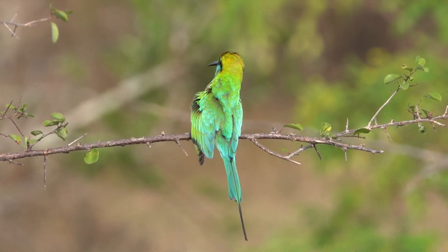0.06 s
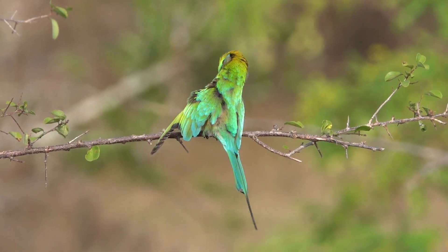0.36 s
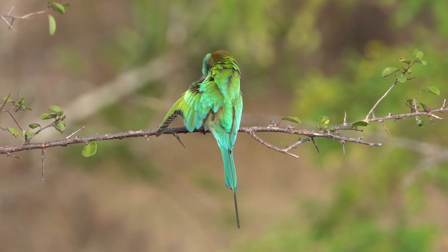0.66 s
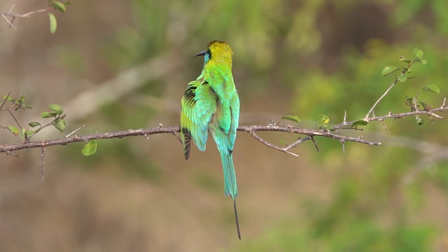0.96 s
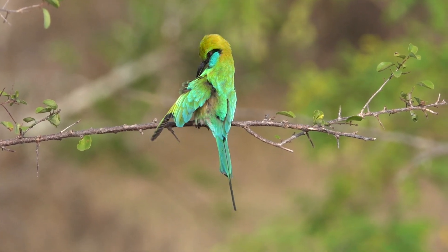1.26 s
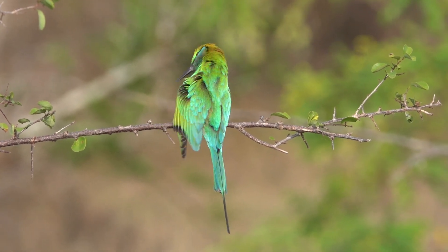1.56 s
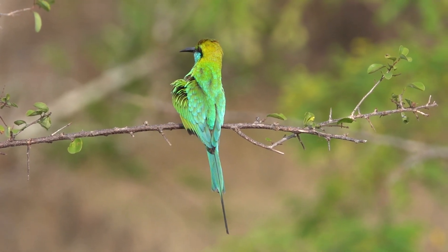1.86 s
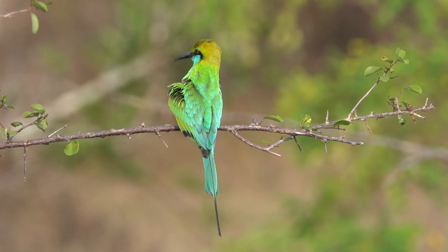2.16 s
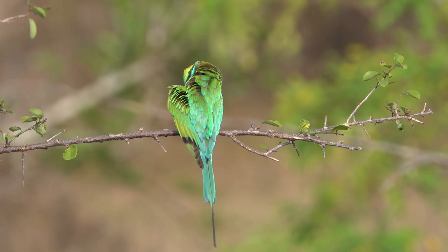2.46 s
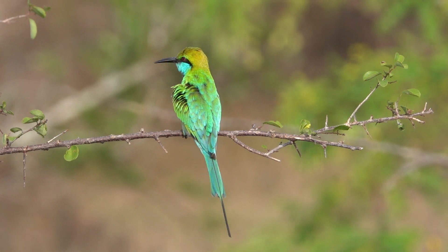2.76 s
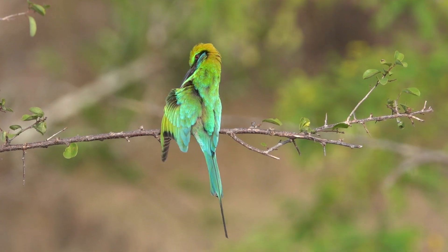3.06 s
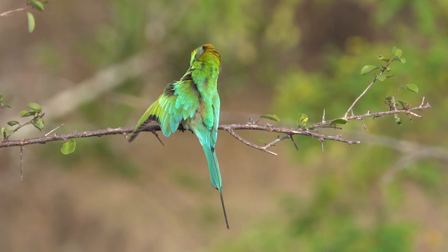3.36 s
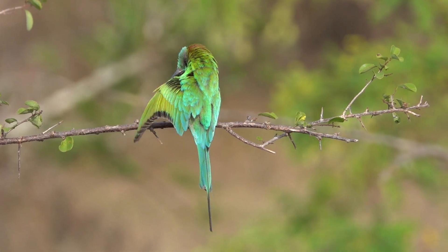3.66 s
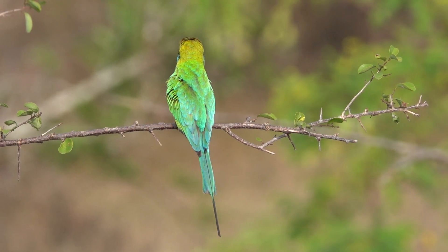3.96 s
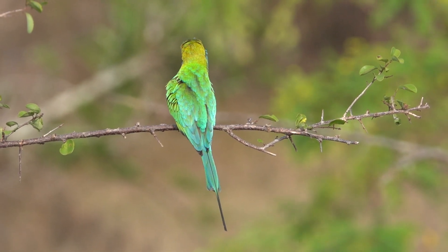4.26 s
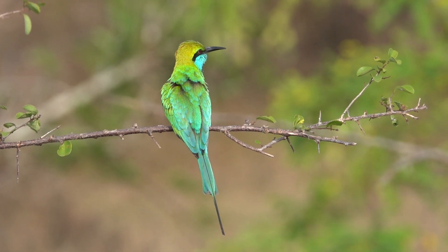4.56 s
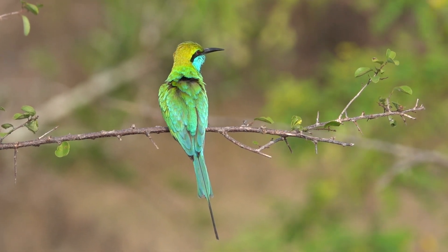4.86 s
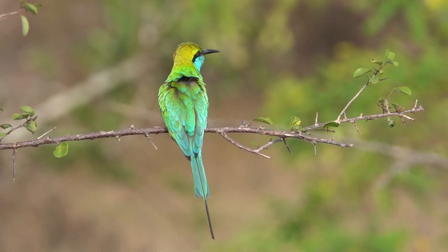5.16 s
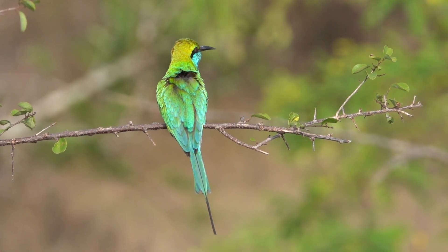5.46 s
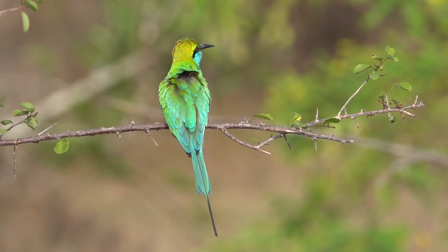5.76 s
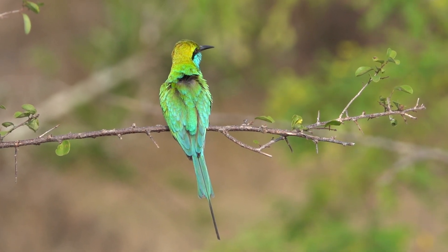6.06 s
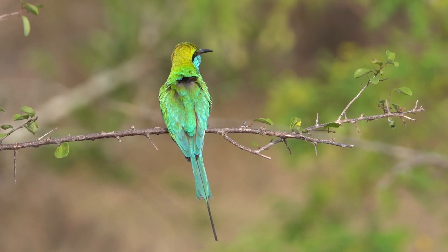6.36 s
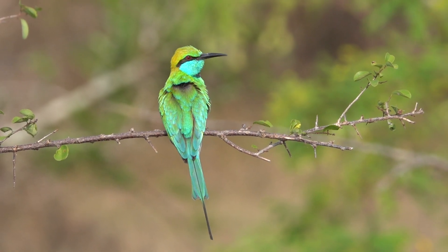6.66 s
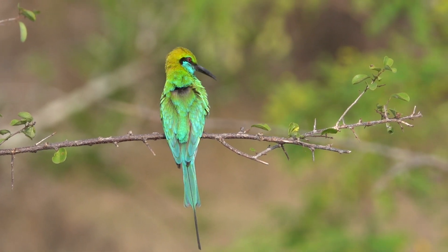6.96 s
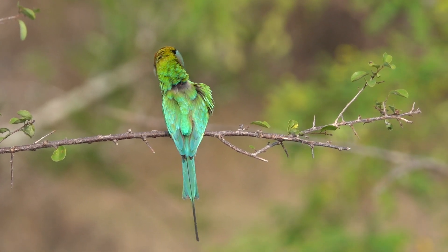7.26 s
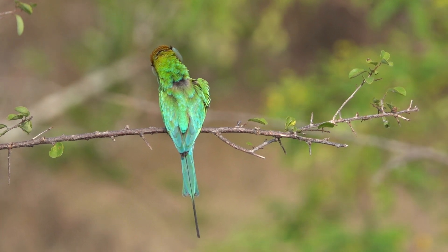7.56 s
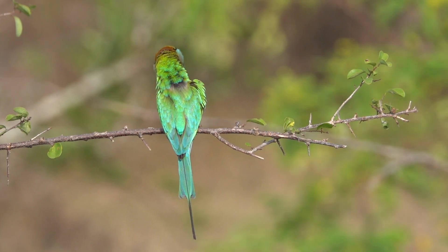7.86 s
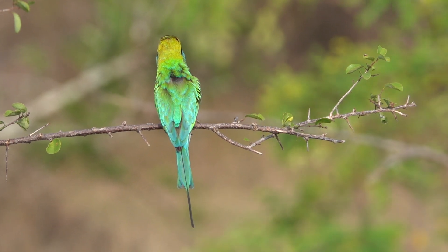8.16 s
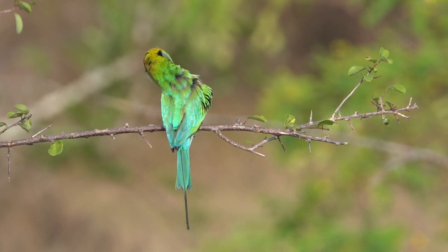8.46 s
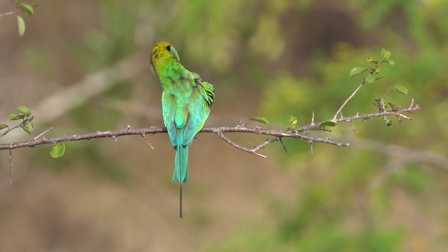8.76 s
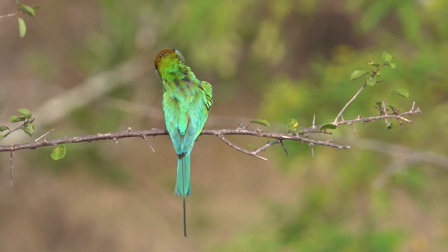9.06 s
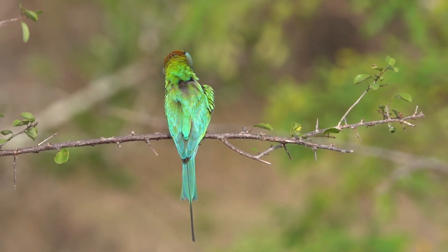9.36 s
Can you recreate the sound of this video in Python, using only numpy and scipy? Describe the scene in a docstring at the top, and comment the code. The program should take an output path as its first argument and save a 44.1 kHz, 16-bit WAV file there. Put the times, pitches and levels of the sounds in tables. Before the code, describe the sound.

Gusty wind rumbles and thumps on the microphone, then eases, while faint birds whistle and chirp in open scrubland.

```python
"""Wind and birds in dry scrubland

Gusts buffet the microphone: their eddies press on its two ports as rumble, flutter and thumps. One faint bird
gives thin, high, falling notes; others whistle and chatter lower down, and the bushes scatter their calls.
Something snaps once on the camera, a few tiny ticks sound close by, some gusts crackle sharply, and the open
country murmurs underneath."""
import sys
import numpy as np
from scipy import signal
from scipy.fft import rfft, irfft
from scipy.io import wavfile
from scipy.ndimage import uniform_filter1d

SR = 44100
rng = np.random.default_rng(int(sys.argv[2]) if len(sys.argv) > 2 else 0)


def store_wav(level_fs):
    """Save 16-bit WAV to argv[1]."""
    pcm = np.round(np.clip(np.atleast_2d(level_fs), -1, 1) * 32767)
    wavfile.write(sys.argv[1], SR, pcm.T.astype(np.int16))


N = 423801
TIME = np.arange(N) / SR
HZ = np.fft.rfftfreq(N, 1 / SR)
STRONG_GUST_DB, STRONG_BUFFET_DB = -24.5, -27.5  # a strong gust and the small eddies it sheds


def wind():
    """Turbulent pressure: large eddies press on both ports alike, small ones hit each port apart."""
    # eddy spectra, from the largest eddies to the smallest: frequency_hz, relative_db
    lull_spectrum = [(8, -13), (22, -5), (45, -1.5), (72, 2), (105, -5), (150, -10.5), (220, -26.5),
                     (400, -64.5), (1500, -120)]
    rumble_spectrum = [(8, -23.5), (22, -15), (45, -6), (70, -2), (105, 0.5), (150, -4), (220, -21),
                       (400, -77.5), (1500, -120)]
    buffet_spectrum = [(50, -23.5), (110, -7), (165, 1.5), (230, -3.5), (320, -13.5), (450, -31.5),
                       (700, -58), (3000, -125)]
    flutter_spectrum = [(130, -10.5), (220, 5.5), (310, 9), (430, 0.5), (580, -10.5), (780, -24.5),
                        (1100, -41), (2000, -57.5), (5000, -71.5), (12000, -105)]
    rumble_db, buffet_db = gust_levels()
    shoves = drift(13)  # a gust arrives unevenly, in eddies of every size
    speed = np.clip((rumble_db + 42) / 18, 0, 1)
    fast = np.sqrt(speed) * eddies(rumble_spectrum, correlation=0.87)
    slow = np.sqrt(1 - speed) * eddies(lull_spectrum, correlation=0.94)  # slow air sounds lower
    rumble = (fast + slow) * amp(rumble_db - 1.22 + 2.28 * shoves + 2.0 * drift(26))
    buffet = eddies(buffet_spectrum, correlation=0.48)
    buffet *= amp(buffet_db - 1.0 + 2.0 * shoves + 2.6 * drift(32))
    # the smallest eddies grow faster than the gust itself, and come in bursts
    growth_db = 0.67 * np.minimum(buffet_db + 21, 3)
    flutter_db = buffet_db - 7.5 + growth_db + 1.4 * shoves + 4.06 * drift(50)
    flutter = eddies(flutter_spectrum, correlation=-0.22) * amp(flutter_db)
    return rumble + buffet + flutter + crackle(buffet_db)


def gust_levels(rise_db_per_s=211, fall_db_per_s=258.5, buffet_growth=1.706):
    """Incoherent addition: gusts and breeze sum in power. Returns large- and small-eddy levels in dB."""
    # gusts: full_strength_at_s, hold_s, level_db, extra_turbulence_db
    gusts = [(0.075, 0.18, -32.0, 3), (0.464, 0.25, -24.5, 2.5), (0.598, 0.027, -22.5, 0.5),
             (0.781, 0.011, -25.5, 4.5), (0.846, 0.14, -28, -1.5), (1.046, 0.13, -23.5, -3.5),
             (1.239, 0.19, -23.5, 0), (1.456, 0.14, -27.5, -4), (1.816, 0.015, -30, 1),
             (1.909, 0.12, -22.0, -1.5), (2.043, 0.23, -29.5, 0.0), (2.296, 0.039, -25.0, 1),
             (2.39, 0.21, -28, -2.5), (2.78, 0.62, -23, 4), (3.015, 0.25, -24, 3.5),
             (3.608, 0.085, -31, -3.5), (3.824, 0.01, -38, 7), (3.917, 0.011, -29.5, -3.5),
             (4.025, 0.013, -41.5, -4), (4.439, 0.011, -23, 5), (4.484, 0.27, -32.0, -0.5),
             (4.697, 0.017, -30, -2), (4.883, 0.099, -39.5, 5.5), (5.059, 0.067, -31.5, 4.5),
             (5.259, 0.076, -35.5, 0.5), (5.426, 0.091, -39, -2), (5.801, 0.22, -33.0, -1),
             (6.144, 0.015, -24, 1.0), (6.249, 0.067, -19, -7.5), (6.299, 0.14, -22, -3.5),
             (6.524, 0.054, -22, -4.5), (6.622, 0.057, -31, -9.5), (6.903, 0.011, -31.5, -8),
             (7.105, 0.086, -39.5, -2), (7.434, 0.15, -37.5, -10.5), (8.092, 0.15, -40.5, -11),
             (8.348, 0.072, -37.5, -13), (8.663, 0.2, -42.5, -8), (9.133, 0.015, -43, -3),
             (9.428, 0.051, -53, 0.0)]
    # light air between gusts: time_s, level_db
    breeze = [(0, -48), (2.7, -49), (5.7, -42), (7.3, -51), (9.6, -55.5)]
    t = np.linspace(0, TIME[-1], N // 64)
    start, hold, db, turbulence_db = np.transpose(gusts)[:, :, None]
    rising_db = rise_db_per_s * np.maximum(start - t, 0)
    falling_db = fall_db_per_s * np.maximum(t - start - hold, 0)
    large_db = np.vstack([db - rising_db - falling_db, np.interp(t, *np.transpose(breeze))])
    small_db = STRONG_BUFFET_DB + buffet_growth * (large_db - STRONG_GUST_DB)
    small_db[:-1] += turbulence_db  # the last row is the breeze
    powers = [(amp(levels) ** 2).sum(0) for levels in (large_db, small_db)]
    return [np.interp(TIME, t, 10 * np.log10(power)) for power in powers]


def eddies(spectrum, correlation):
    """Stationary turbulence: steady in power, lumpy only from one eddy to the next."""
    pressure = noise(spectrum, correlation)
    local_power = uniform_filter1d((pressure ** 2).mean(0), size=2600)
    return pressure / np.sqrt(local_power + 1e-12)


def crackle(buffet_db, max_per_s=41, rise_s=0.00041, fall_s=0.0013):
    """Shot noise: the sharpest eddies flick one port or the other, more often as the gust grows."""
    t = TIME[:SR // 100]
    flick = np.gradient((1 - np.exp(-t / rise_s)) ** 3 * np.exp(-t / fall_s))
    activity = np.minimum(amp(buffet_db - STRONG_BUFFET_DB), 1)
    hits = rng.random((2, N)) < max_per_s / 2 / SR * activity
    peak_db = buffet_db - 21 + 2.5 * np.minimum(rng.exponential(1, (2, N)), 3)
    return signal.oaconvolve(hits * amp(peak_db), flick[None] / flick.max(), axes=1)[:, :N]


def thumps(rise_s=0.00047, other_port_db=-8):
    """Bipolar pressure pulse: a passing eddy gives one push and pull, mostly on one port."""
    # single eddies: start_s, peak_db
    passes = [(0.476, -11.5), (0.505, -18), (0.633, -13), (0.686, -10.5), (1.233, -8), (1.29, -12.5),
              (1.384, -10), (2.305, -21), (2.783, -6.5), (2.84, -11.5), (2.977, -7), (3.209, -12),
              (3.377, -17.5), (4.421, -9), (6.235, -11.5)]
    out, u = np.zeros((2, N)), TIME[:SR // 50] / rise_s
    pulse = np.gradient(u ** 6 * np.exp(-u))
    for (s, db), port in zip(passes, rng.integers(0, 2, len(passes))):
        sides = np.roll([1, amp(other_port_db)], port)[:, None]
        add(out, s, amp(db) * sides * pulse / pulse.max())
    return out


def syrinx(hz, level_db, rasp, buzz_hz=85, buzz_depth=.07, jitter=0.12, waver_db=3.0):
    """Modulation: a near-pure whistle turns raspy as buzz and jitter shake its pitch and level."""
    t = np.arange(len(hz)) / SR
    shake = unit_rms(uniform_filter1d(rng.standard_normal(SR), size=45))[:len(t)]
    waver = unit_rms(uniform_filter1d(rng.standard_normal(SR), size=500))[:len(t)]
    buzz = np.sin(2 * np.pi * (buzz_hz * t + rng.random()))
    pitch_hz = hz * (1 + rasp * (buzz_depth * buzz + jitter * shake))
    phase = 2 * np.pi * np.cumsum(pitch_hz) / SR
    overtone = amp(-27) * np.sin(2 * phase) * (hz < 4500)
    low_voice = rasp * amp(-6.5) * np.sin(0.9 * phase) * (1 + buzz)  # the other side of the syrinx
    envelope = amp(level_db + waver_db * waver) * (1 + 0.12 * rasp * buzz)
    return np.sqrt(2) * (np.sin(phase) + overtone + low_voice) * envelope


def high_bird(rasp=.07):
    """Frequency glides: thin notes flick up and slide steeply down."""
    # contours of the short and the long note: time_s, pitch_hz, relative_db
    seet_shape = [(0, 6300, -5), (.014, 8020, -3.5), (.028, 7300, 0), (.046, 6850, -2), (.066, 5900, -7.5),
                  (.08, 5520, -6.5), (.105, 5400, -20.5)]
    slur_shape = [(0, 6600, -17), (.015, 7100, -14), (.048, 7100, -5.5), (.07, 6070, -8.5),
                  (.095, 5350, -19.5), (.125, 5070, -18), (.16, 4440, -21)]
    # notes of each shape: start_s, level_db, pitch_factor, length_factor
    seets = [(.18, -63.5, 1.02, 0.85), (1.372, -66.5, 0.98, 1.3), (1.564, -63, 0.98, 0.79),
             (3.808, -74, 1, 1.1), (3.997, -69, 0.97, 1.02), (9.394, -75.5, 0.97, 1.7)]
    slurs = [(1.778, -60.5, 1, 1), (2.119, -64, 0.96, .93), (4.228, -64.5, 1, 0.94)]
    out = np.zeros(N)
    for shape, notes in ((seet_shape, seets), (slur_shape, slurs)):
        times, hz, db = np.transpose(shape)
        for s, level_db, pitch_factor, stretch in notes:
            t = np.arange(0, times[-1], 1 / SR / stretch)
            glide = uniform_filter1d(np.interp(t, times, hz), size=200)
            note = syrinx(pitch_factor * glide, level_db + np.interp(t, times, db), rasp)
            add(out, s, note * signal.windows.tukey(len(t), .1))
    return out


def whistles(notes):
    """Continuous tuning: the syrinx glides smoothly through each note's evenly spaced pitches."""
    out = np.zeros(N)
    for s, length, db, *pitches, rasp in notes:
        curve = np.polyfit(np.linspace(0, 1, len(pitches)), pitches, len(pitches) - 1)
        hz = np.polyval(curve, np.linspace(0, 1, round(length * SR)))
        add(out, s, syrinx(hz, db, rasp) * signal.windows.tukey(len(hz), .25))
    return out


def falling(hz, octaves):
    """Decelerating glide: four pitches that drop quickly and then level off."""
    # at four even steps: share_of_fall
    slide_shape = [0, .53, .81, 1]
    return hz / 2 ** (octaves * np.array(slide_shape))


def songster():
    """Frequency-modulated song: one bird gives its phrase twice, the second time more softly."""
    # arch, buzz, low note, rise, buzz, dip: offset_s, length_s, level_db, four of pitch_hz, rasp
    phrase = [ (0, .135, -63.5, 1908, 2590, 2550, 2200, 0.095),
              (.233, .075, -63.5, 2620, 2480, 2380, 2150, .58),
              (.41, 0.078, -76.5, 1615, 1700, 1820, 1800, 0.083),
              (.55, .072, -67, 2330, 2680, 2940, 3220, 0.2),
              (0.626, 0.16, -68, 3180, 2900, 2640, 2510, .62),
              (.872, 0.18, -65.5, 2740, 2115, 2357, 2950, 0.11)]
    # repeats of the phrase: start_s, gain_db
    repeats = [(.065, 0), (7.365, -4)]
    return whistles([(start + s, length, gain_db + db, *voice)
                     for start, gain_db in repeats for s, length, db, *voice in phrase])


def chirps(hoarse_ratio=.63, hoarse_db=-12.5, hoarse_rasp=1):
    """Biphonation: buzzy falling notes, each with a hoarse second voice below it."""
    # chirps: start_s, length_s, level_db, first_pitch_hz, fall_octaves, rasp
    calls = [(0.646, 0.017, -66.5, 4080, .17, .3), (2.672, 0.02, -71.5, 3480, 0.084, .2),
             (2.759, 0.029, -67.5, 2450, 0.21, 0.26), (2.972, 0.026, -65, 2550, .19, 0.2),
             (3.031, 0.035, -72, 2570, .22, 0.8), (3.096, .012, -72, 3900, .1, 0),
             (3.483, 0.033, -66.5, 3580, .18, 0.44), (4.707, .052, -62, 3540, .32, 0.5),
             (5.098, 0.074, -59, 3490, 0.36, 0.37), (6.455, .05, -64, 3620, 0.16, .24),
             (6.853, .055, -64.5, 3550, .13, 0.2), (8.527, 0.078, -70.5, 3580, 0.071, 0.43),
             (9.538, 0.056, -66, 3470, 0.093, .2)]
    upper = [(s, length, db, *falling(hz, fall), rasp) for s, length, db, hz, fall, rasp in calls]
    lower = [(s, length, db + hoarse_db, *falling(hz * hoarse_ratio, fall), hoarse_rasp)
             for s, length, db, hz, fall, _ in calls]
    return whistles(upper + lower)


def far_whistlers(slide_rasp=.1, swoop_rasp=.3, arch_rasp=.22):
    """Frequency sweeps: scattered birds slide down, swoop up or arch over."""
    # falling notes: start_s, length_s, level_db, first_pitch_hz, fall_octaves
    slides = [(0.638, .045, -77, 5000, .36), (0.86, 0.064, -74, 6200, 0.84),
              (0.99, 0.044, -76.5, 5500, 0.75), (1.555, 0.069, -82, 3780, .08),
              (2.42, 0.12, -77, 2380, .38), (5.348, 0.095, -70.5, 2170, 0.13),
              (5.532, 0.079, -81, 7650, 0.047), (6.7, 0.11, -74.5, 2950, 0.086),
              (6.87, 0.14, -75, 2820, 0.023), (7.79, .085, -81, 5100, .4)]
    # rising notes: start_s, length_s, level_db, base_pitch_hz
    swoops = [(2.823, 0.068, -68, 2196), (8.302, .095, -64, 2370)]
    # arched notes: start_s, length_s, level_db, top_pitch_hz, depth_octaves
    arches = [(5.604, .045, -66.5, 2810, 0.057), (6.636, 0.036, -72, 3330, 0.24),
              (7.068, .062, -68.5, 3560, 0.096), (8.969, 0.054, -65, 3150, 0.34)]
    swoop_ratios, arch_shares = np.array([0.75, 1, 1.15, 1.9]), np.array([0.92, 0.034, 0, 1])
    notes = [(s, length, db, *falling(hz, fall), slide_rasp) for s, length, db, hz, fall in slides]
    notes += [(s, length, db, *(hz * swoop_ratios), swoop_rasp) for s, length, db, hz in swoops]
    notes += [(s, length, db, *(hz / 2 ** (depth * arch_shares)), arch_rasp)
              for s, length, db, hz, depth in arches]
    return whistles(notes)


def chips():
    """Roughness: brief, strongly modulated voices overlap as a low scrape with a clearer top."""
    # harsh calls: start_s, level_db
    calls = [(4.347, -68), (5.595, -70), (5.865, -66), (6.001, -64)]
    # voices of one call: delay_s, length_s, pitch_hz, relative_db, rasp
    voices = [(0, 0.012, 2180, 1.5, 1), (.002, 0.018, 2940, -7, 1), (.004, .02, 3950, 3.5, .4)]
    out = np.zeros(N)
    for s, db in calls:
        for delay, length, hz, voice_db, rasp in voices:
            n = round(length * SR)
            voice = syrinx(np.full(n, hz), db + voice_db, rasp)
            add(out, s + delay, voice * signal.windows.tukey(n, .5))
    return out


def snap(crack_db=5, crack_t60_s=0.0055, cutoff_hz=7500):
    """Impulse response: a double click rings the camera body, with a crack that differs at each port."""
    # modes of the body: frequency_hz, relative_db, t60_s
    modes = [(1040, 5.5, 0.032), (1330, 10.5, 0.0087), (2000, 2, 0.016), (2330, -3.5, 0.035),
             (2540, 0.5, 0.0084), (3000, -15, .03), (3400, 3, 0.0053), (4580, -14.5, .016),
             (5060, -27, .016), (6100, -8, 0.0091), (6960, -4, 0.013), (7400, -13, 0.015)]
    # the two clicks: start_s, level_db
    impacts = [(6.3469, -32), (6.349, -44)]
    out, t = np.zeros((2, N)), TIME[:SR // 8]
    ring = sum(amp(db - 60 * t / t60) * np.sin(2 * np.pi * hz * t) for hz, db, t60 in modes)
    lowpass = signal.butter(1, cutoff_hz, fs=SR)
    for s, db in impacts:
        crack = signal.lfilter(*lowpass, rng.standard_normal((2, len(t))))
        crack *= amp(crack_db - 60 * t / crack_t60_s)
        add(out, s, amp(db) * (ring + crack))
    return out


def ticks(t60_s=0.025, relative_width=0.42):
    """Exponential decay: each tick is a short burst of noise in a band around its own pitch."""
    # tiny ticks close by, and a few sharp crackles within the gusts: start_s, level_db, centre_hz
    bursts = [(.8086, -66, 13000), (1.8642, -63, 13300), (1.931, -53, 1570), (3.116, -48, 1700),
              (3.212, -46.5, 1680), (3.5379, -66, 12000), (4.021, -43, 754), (4.441, -56, 1700),
              (4.687, -51.5, 1410), (4.797, -52.5, 2350), (5.191, -34.5, 670), (6.141, -73, 13900),
              (7.9932, -61, 14100), (9.542, -62, 9800)]
    out, t = np.zeros(N), TIME[:SR // 20]
    f = np.fft.rfftfreq(len(t), 1 / SR)
    for s, db, hz in bursts:
        band = np.exp(-((f / hz - 1) / relative_width) ** 2)
        burst = unit_rms(irfft(rfft(rng.standard_normal(len(t))) * band, len(t)))
        attack = 1 - np.exp(-t * hz)
        add(out, s, burst * attack * amp(db - 4.5 - 60 * t / t60_s))
    return out


def scrub(x, wet_db, t60_s, pan_db):
    """Scattering: dense, weak echoes from bushes follow the direct sound, different in each ear."""
    t = TIME[:SR]
    echoes = rng.standard_normal((2, SR)) * (rng.random((2, SR)) < .06)
    echoes *= amp(-60 * t / t60_s) * (t > .003)
    tail = signal.fftconvolve(np.atleast_2d(x), echoes / np.linalg.norm(echoes[0]), axes=1)[:, :N]
    return x * amp([[pan_db / 2], [-pan_db / 2]]) + amp(wet_db) * tail


def air():
    """Partly coherent ambience: a far murmur of open country over a hiss with a faint insect band."""
    # background spectra: frequency_hz, density_db
    murmur_spectrum = [(30, -80.5), (270, -89.5), (390, -89.5), (480, -93), (590, -93), (720, -88),
                       (830, -97), (950, -91.5), (1100, -99), (1600, -103), (2400, -104), (3200, -107.5),
                       (4200, -117), (9000, -132)]
    hiss_spectrum = [(1000, -120), (4600, -118), (5100, -110), (5900, -116), (7500, -117), (9500, -120),
                     (14000, -120), (16000, -122)]
    # likeness of left and right: frequency_hz, correlation
    coherence = [(60, 1), (290, 0.98), (640, 0.26), (1400, 0.15), (3100, 0.27), (7000, 0.54), (15000, 0.94)]
    correlation = log_curve(coherence)
    murmur = noise(murmur_spectrum, correlation) * amp(drift(8.8))
    return murmur + noise(hiss_spectrum, correlation)


def noise(spectrum, correlation):
    """Spectral shaping of stereo noise; the balance of mid and side sets the left-right correlation."""
    a, b = rfft(rng.standard_normal((2, N)))
    mid, side = a * np.sqrt((1 + correlation) / 2), b * np.sqrt((1 - correlation) / 2)
    return irfft(np.array([mid + side, mid - side]) * amp(log_curve(spectrum)), N) * np.sqrt(SR / 2)


def drift(rate_hz):
    """Low-passed noise: smooth random motion of rms 1."""
    return unit_rms(irfft(rfft(rng.standard_normal(N)) * np.exp(-(HZ / rate_hz) ** 2), N))


def log_curve(points):
    """Linear interpolation on a log-frequency axis."""
    f, value = np.transpose(points)
    return np.interp(np.log(HZ + 1), np.log(f + 1), value)


def amp(db):
    """Decibels to amplitude ratio."""
    return 10 ** (np.asarray(db) / 20)


def unit_rms(x):
    """Normalisation to rms 1."""
    return x / np.sqrt(np.mean(x ** 2) + 1e-20)


def add(mix, start_s, sound):
    """Superposition of a sound on the mix from start_s on."""
    part = mix[..., max(round(start_s * SR), 0):][..., :sound.shape[-1]]
    part += sound[..., :part.shape[-1]]


def scene():
    """Superposition of wind, birds far off in the bushes, clicks close by and the open air."""
    birds = scrub(high_bird(), wet_db=0.5, t60_s=0.5, pan_db=10.0)
    birds += scrub(songster(), wet_db=-2, t60_s=0.25, pan_db=-7.0)
    birds += scrub(chirps(), wet_db=-3.5, t60_s=0.51, pan_db=2.5)
    birds += scrub(far_whistlers(), wet_db=-1.5, t60_s=.45, pan_db=-1.5)
    birds += scrub(chips(), wet_db=-2, t60_s=0.44, pan_db=1.2)
    clicks = scrub(snap() + ticks(), wet_db=-9.5, t60_s=0.086, pan_db=-1.5)
    return wind() + thumps() + air() + birds + clicks


def record(dry):
    """Band limiting: a steep low-pass removes the treble above 15.8 kHz."""
    lowpass = signal.firwin(511, 15800, window=("kaiser", 9), fs=SR)
    return signal.oaconvolve(dry, lowpass[None], "same")


dry = scene()
out = record(dry)
store_wav(out)
```